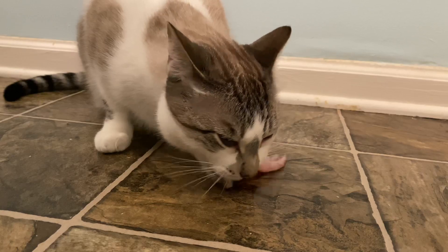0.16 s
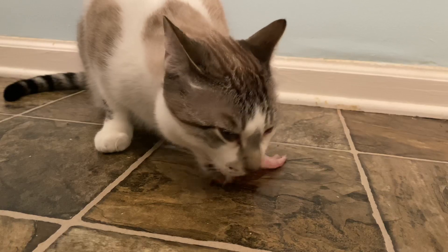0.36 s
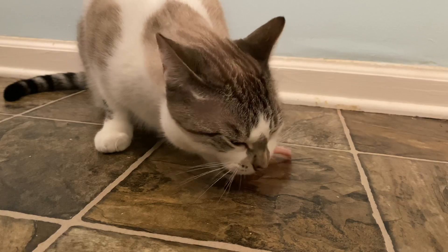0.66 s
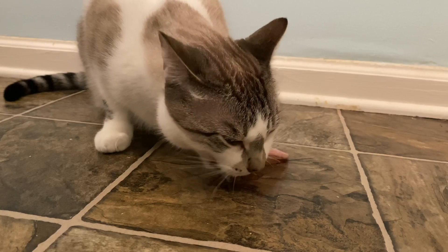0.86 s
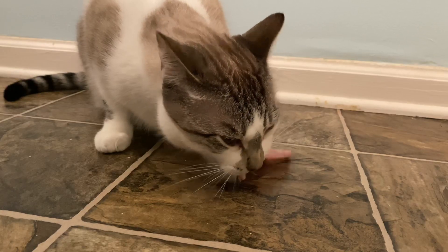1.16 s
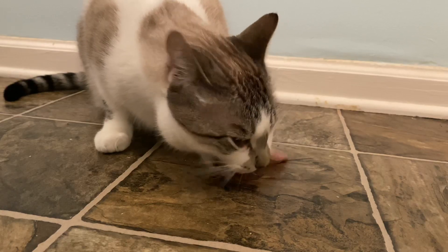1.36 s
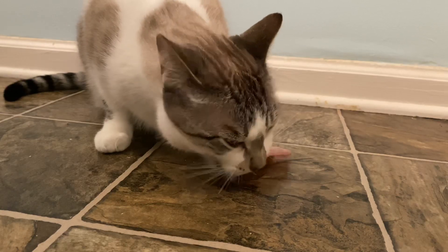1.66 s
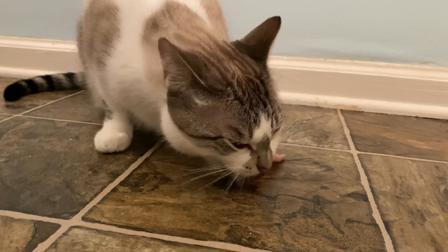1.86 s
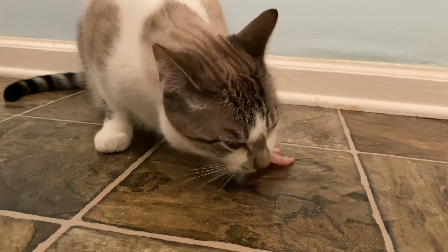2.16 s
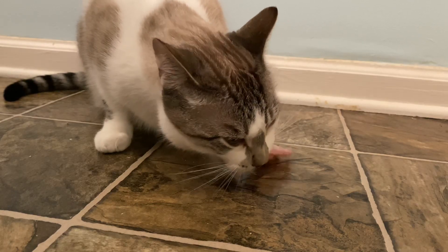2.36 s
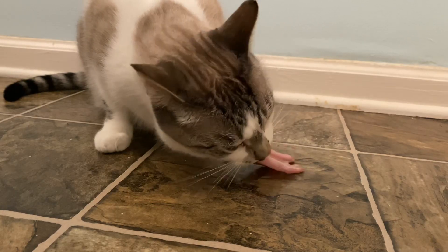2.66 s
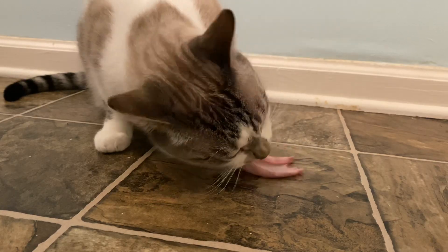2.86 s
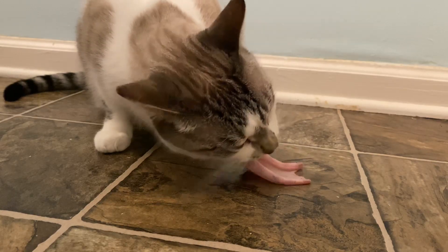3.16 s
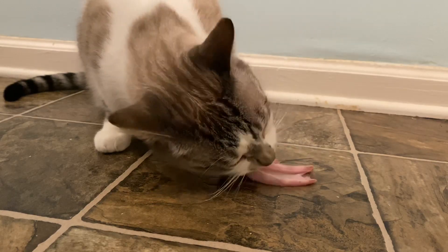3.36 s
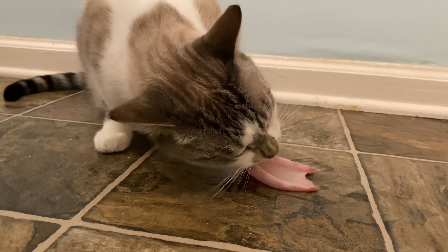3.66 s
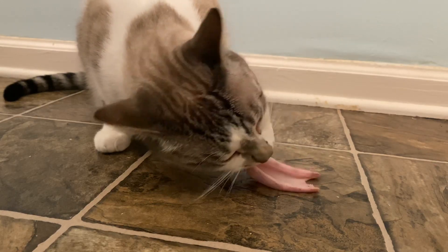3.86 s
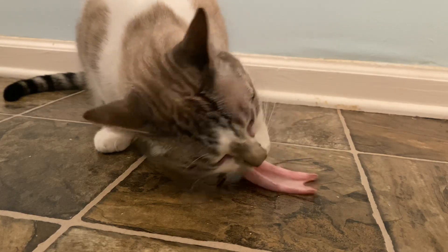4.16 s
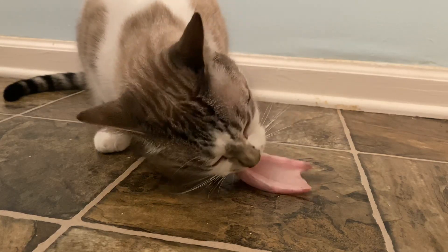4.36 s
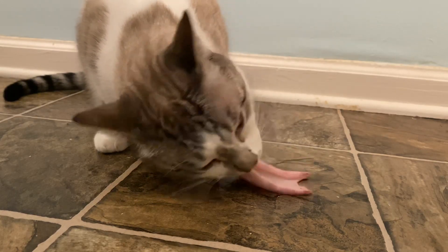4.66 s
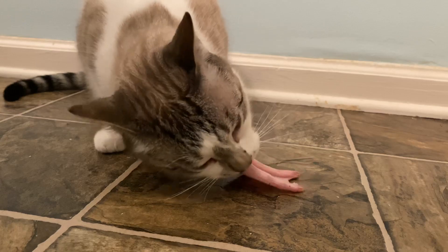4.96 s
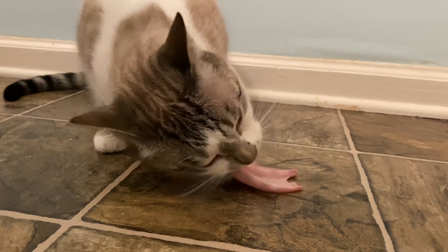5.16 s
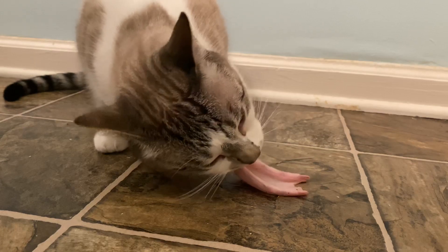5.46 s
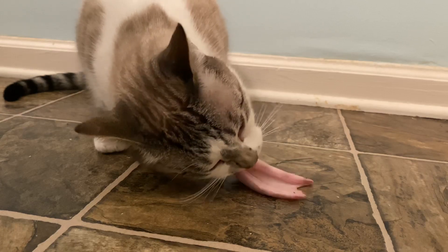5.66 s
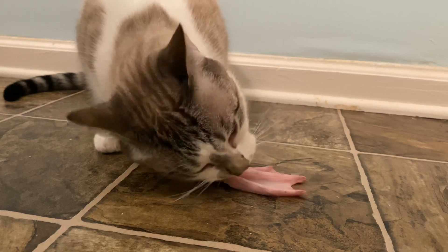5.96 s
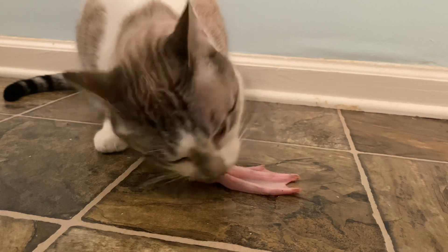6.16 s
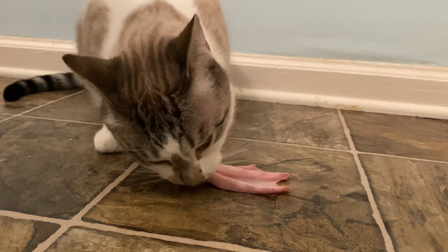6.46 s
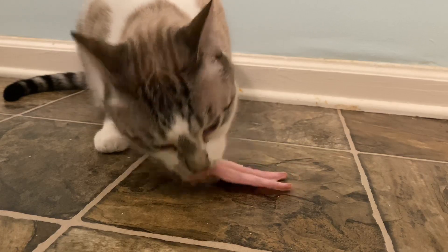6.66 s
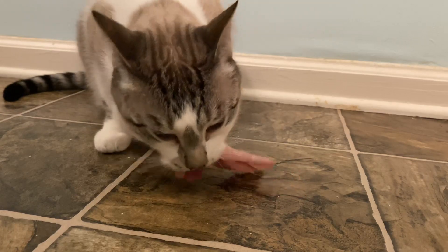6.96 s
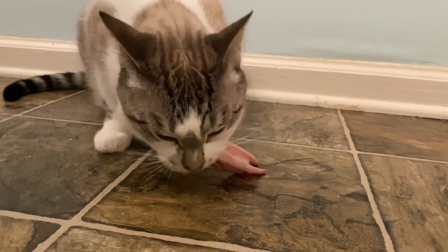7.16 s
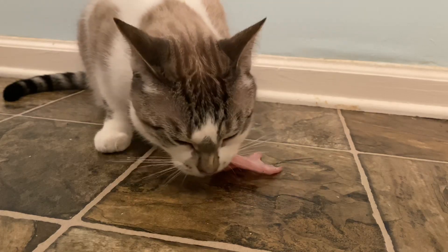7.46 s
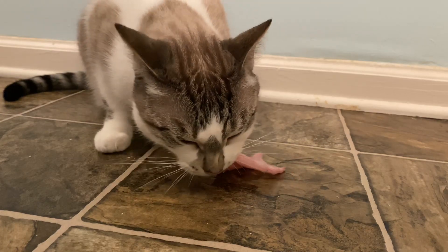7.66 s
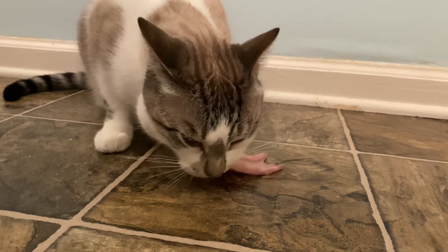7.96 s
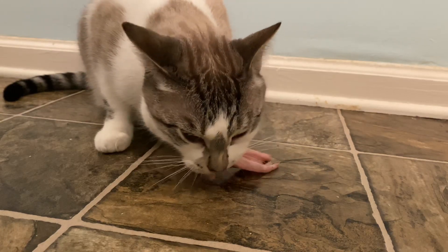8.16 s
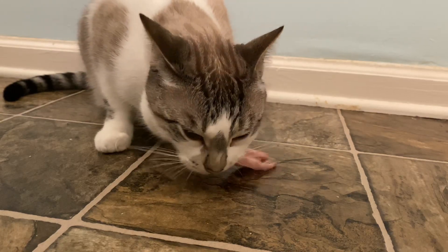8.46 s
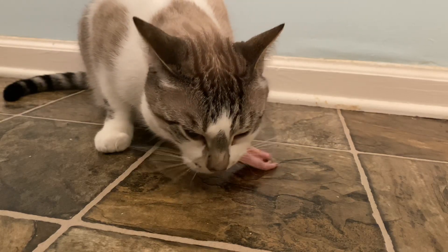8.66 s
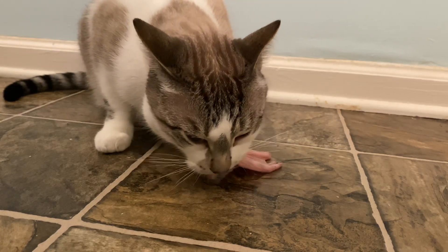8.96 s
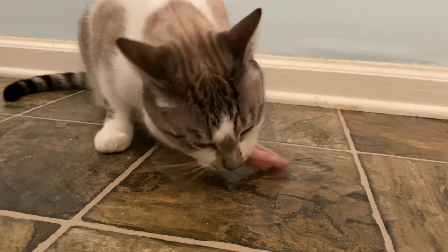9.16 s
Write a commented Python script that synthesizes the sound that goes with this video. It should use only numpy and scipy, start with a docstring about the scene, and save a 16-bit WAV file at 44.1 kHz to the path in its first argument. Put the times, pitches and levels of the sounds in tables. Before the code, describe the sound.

A cat chews a raw bird's foot very close to a stereo microphone. Irregular tooth clicks and brittle bone cracks stand out over wet squelches and crackling skin, loudest near three to four seconds and again at about seven and a half. A calmer stretch lies between. The small tiled room rings briefly after each crack, over faint rumble and hiss.

```python
"""Teeth click and small bones crack: a cat gnaws a raw bird's foot, close to a stereo pair of microphones.
Wet skin squelches and crackles between the bites; dull bumps and one soft rub lie underneath.
The place is a small hard room with a tiled floor: it rings after each crack, over faint rumble and hiss.
A thin whistle comes and goes, heard only by way of the room.
Bites are noise bursts through resonances, wet sounds are sparse pops, bumps and whistle are sines."""
import sys
import numpy as np
from scipy import signal
from scipy.fft import rfft, irfft
from scipy.io import wavfile
from scipy.ndimage import uniform_filter1d

SR = 44100
rng = np.random.default_rng(int(sys.argv[2]) if len(sys.argv) > 2 else 0)


def digitize_waveform(pressure):
    """Quantize a signal to 16-bit integers and store it at the path in sys.argv[1].

    Rows of a 2-D input are taken as channels; values are limited to [-1, 1].
    """
    field = np.atleast_2d(pressure).T
    bounded = np.clip(field, -1, 1)
    quanta = np.round(bounded * 32767).astype(np.int16)
    wavfile.write(sys.argv[1], SR, quanta)


N = 410571
TIME = np.arange(N) / SR  # [s]
KERNEL_HZ = np.fft.rfftfreq(2048, 1 / SR) + 1  # frequencies at which resonances are drawn, kept off zero

# Hard bites: (t/s, pitch of the snap f/Hz, snap level/dB, dull jaw knock level/dB, sharp tick level/dB)
BITES = [(0.029, 2530, -46.5, -53.5, -73), (0.2319, 1400, -65, -77, -62), (0.311, 2370, -55, -77, -65),
         (0.3793, 1570, -51, -74, -62), (0.4775, 1770, -57, -50, -57.5), (0.5521, 2240, -33.5, -43.5, -36),
         (0.6135, 1830, -41, -64, -57), (0.634, 1930, -49, -42.5, -74), (0.6921, 1920, -41.5, -47, -44.5),
         (0.8781, 2600, -42, -74, -47), (1.0545, 1210, -52, -67, -66), (1.0915, 1540, -49, -51.5, -47.5),
         (1.284, 1540, -57.5, -77, -61.5), (1.377, 1860, -49, -51, -65), (1.472, 1260, -58, -61, -43.5),
         (1.5289, 2290, -41, -51, -33.5), (1.7238, 2520, -47.5, -64, -75), (1.8117, 2400, -61, -68, -50.5),
         (1.8248, 2140, -46, -49.5, -50.5), (1.898, 2400, -64, -73, -55.5), (2.018, 2230, -44, -64, -47.5),
         (2.314, 2400, -75, -74, -62), (2.397, 1270, -64, -82, -55), (2.4418, 1640, -46.5, -70, -66),
         (2.4853, 2360, -58, -81, -62), (2.684, 6000, -74, -87, -57), (2.714, 1800, -48.5, -60, -46.5),
         (2.8867, 1970, -36, -42, -38.5), (2.987, 1580, -56, -44.5, -57), (3.0204, 1670, -50, -68, -45),
         (3.044, 1380, -25.5, -36.5, -19.5), (3.1739, 1950, -57, -54, -42), (3.3878, 1690, -35, -37, -39.5),
         (3.414, 1870, -52, -51, -43.5), (3.4716, 1580, -51.5, -63, -43.5), (3.528, 3440, -35, -26.5, -42),
         (3.6135, 2120, -20, -26.5, -32), (3.6738, 4040, -30.5, -24.5, -40.5),
         (3.962, 1800, -55.5, -66, -56), (4.2035, 1890, -45, -51.5, -52.5),
         (4.3101, 2020, -53.5, -55.5, -58.5), (4.384, 1670, -68, -60, -57), (4.458, 1420, -43, -59, -39),
         (4.5447, 2470, -57, -78, -62), (4.739, 1230, -49.5, -52, -66), (4.893, 4070, -54, -76, -79),
         (5.0173, 1810, -48, -66, -53.5), (5.0772, 2210, -49.5, -76, -75), (5.152, 2460, -41, -52, -75),
         (5.2325, 2720, -50, -48.5, -78.5), (5.261, 2470, -47.5, -45.5, -78),
         (5.6679, 1560, -52.5, -59.5, -73.5), (6.678, 1580, -57.5, -74.5, -56),
         (6.707, 1670, -60, -66, -52.5), (6.8017, 2090, -64, -75.5, -61.5),
         (6.9897, 4550, -54.5, -70.5, -62), (7.434, 1670, -52, -52, -56), (7.5436, 4070, -36.5, -37.5, -45),
         (7.5679, 1970, -15, -23, -28.5), (7.7535, 3410, -48.5, -72, -75), (7.807, 2160, -52, -49, -50.5),
         (7.938, 1460, -48, -56, -60), (8.1085, 1200, -53, -46, -52.5), (8.355, 1670, -49.5, -82, -75),
         (8.439, 2034, -55.5, -72, -57.5), (8.4958, 2090, -32, -43, -33.5), (8.612, 2630, -48, -72, -70),
         (8.6856, 2160, -41, -71.5, -60), (9.0334, 1670, -57, -78.5, -58)]
# Freed pieces that ring on: (t/s, f/Hz, fall by 60 dB t/s, level/dB before RING_TRIM_DB)
FREED_PIECES = [(.552, 5120, 0.0089, -37.5), (0.877, 2730, 0.038, -48), (1.529, 4540, 0.017, -43),
                (3.0438, 5600, 0.0091, -18.5), (3.0445, 4930, 0.0054, -22.5), (3.045, 1630, 0.013, -40),
                (3.614, 1630, 0.0052, -19), (4.458, 1540, .02, -45.5), (5.15, 2600, .12, -57),
                (5.231, 2850, .05, -51.5), (6.988, 4980, .015, -51), (7.568, 1870, 0.02, -18.5),
                (7.568, 462, 0.019, -40), (7.937, 1594, 0.037, -48), (8.109, 1293, .06, -50.5),
                (8.686, 3040, .025, -44), (8.686, 1500, 0.045, -50.5)]
# Jaw strokes: (t/s, length t/s, mouth resonance f/Hz, then, before their trims:
# squelch level/dB, skin crackle level/dB, saliva fizz level/dB)
JAW_STROKES = [(0.027, 0.082, 1830, -55, -58, -72.5), (.235, 0.1, 2270, -80, -71.5, -85),
               (.365, .09, 1710, -56, -57.5, -70), (.49, .05, 2000, -76, -66, -73),
               (0.551, 0.1, 2500, -50.5, -53.5, -64), (0.862, .05, 2790, -61, -68.5, -64),
               (1.059, 0.08, 1580, -66, -60.5, -69), (1.283, 0.046, 1690, -57, -66, -76),
               (1.344, 0.082, 1900, -57, -59, -66.5), (1.466, 0.12, 1770, -63, -56, -65),
               (1.641, 0.11, 2520, -55.5, -55.5, -71.5), (1.789, 0.13, 2120, -71, -62.5, -65.5),
               (1.999, 0.054, 2160, -58, -65, -67.5), (2.121, 0.029, 1930, -60.5, -69, -72.5),
               (2.197, 0.016, 2000, -74, -70.5, -81), (2.4, 0.085, 1600, -56, -64.5, -75.5),
               (2.697, 0.085, 1600, -58.5, -58, -65.5), (2.799, 0.054, 1800, -70, -66.5, -88),
               (2.877, 0.052, 2170, -51, -54.5, -67.5), (2.988, 0.1, 1700, -63, -56, -64),
               (3.171, .04, 2000, -51.5, -58, -63), (3.286, .08, 1810, -78, -68, -72),
               (3.386, .11, 1750, -65, -61, -67), (3.536, 0.25, 2000, -57.5, -52.5, -65.5),
               (3.87, 0.12, 1800, -73, -69.5, -80), (4.017, .04, 1515, -66, -75, -92.5),
               (4.13, 0.028, 1760, -58.5, -64.5, -70.5), (4.201, 0.042, 1730, -63, -64, -75),
               (4.287, 0.15, 1700, -73.5, -63, -74), (4.459, .05, 1500, -68, -65, -64.5),
               (4.582, .09, 1980, -53, -57.5, -69.5), (4.749, 0.093, 1550, -65, -59, -66),
               (4.882, .08, 1700, -74.5, -69.5, -81), (4.998, .04, 1740, -54.5, -59, -68.5),
               (5.063, .04, 1930, -52, -66, -72), (5.15, .04, 2530, -66, -60, -70),
               (5.212, 0.061, 2710, -49, -59, -80), (5.358, 0.053, 2150, -55.5, -65, -70),
               (5.546, 0.12, 1600, -70.5, -63.5, -70), (5.764, 0.061, 1850, -57.5, -59.5, -70),
               (5.99, .025, 1750, -71, -74, -87), (6.079, .06, 1860, -60.5, -62.5, -81.5),
               (6.53, 0.099, 1700, -89.5, -91, -83), (6.68, 0.056, 1690, -64, -64.5, -69),
               (6.904, 0.055, 1310, -71, -66.5, -77.5), (6.992, .05, 1590, -53, -54, -75),
               (7.049, 0.093, 1600, -70.5, -64, -69.5), (7.253, 0.086, 1650, -65, -63, -80),
               (7.338, 0.057, 1540, -61, -62.5, -67), (7.46, .14, 1590, -65, -64, -80),
               (7.789, 0.031, 2410, -53.5, -61, -64.5), (7.895, 0.067, 1550, -53.5, -64, -64.5),
               (7.982, .09, 1490, -76, -65.5, -77), (8.11, 0.045, 1340, -65, -62.5, -74),
               (8.216, 0.064, 1500, -75, -67.5, -71), (8.344, 0.066, 1540, -59, -59.5, -72.5),
               (8.495, 0.047, 2000, -64, -56, -60), (8.669, 0.022, 2420, -51, -62, -64),
               (8.806, 0.046, 1590, -61, -60, -68.5), (9.03, 0.13, 1693, -64.5, -61.5, -74.5)]
# Spectrum of the sharp ticks: (f/Hz, relative level/dB)
TICK_COLOUR = [(300, -48), (1000, -28.5), (3000, -2), (5600, 2.5), (6600, 1.5), (8000, -1.5), (9300, -13),
               (11500, -3.5), (13400, -16.5), (15200, -3), (17000, -24)]
# Spectrum of crackling skin: (f/Hz, relative level/dB)
SKIN_COLOUR = [(150, -12), (400, 0), (520, -4.5), (850, 4.5), (1100, -7.5), (1600, 6.5), (2100, -3.5),
               (2800, 0), (3500, -15.5), (4500, -9.5), (7000, -30.5), (16000, -45.5)]
# Spectrum of fizzing saliva: (f/Hz, relative level/dB)
SALIVA_COLOUR = [(1000, -31.5), (3000, -8), (4500, -0.5), (7500, 0), (9300, -9), (11500, -0.5),
                 (13400, -10.5), (15200, -3.5), (17000, -17.5)]
# Fixed resonances and dips of the mouth's sounds: (centre f/Hz, width f/Hz, boost level/dB)
MOUTH_RESONANCES = [(436, 60, 8), (540, 63, -4.5), (850.6, 110, 8.5), (1207, 150, -7), (1587, 140, 5),
                    (1985, 410, 5), (2727, 100, 4.5)]
# Dull bumps: (t/s, swell t/s, rms level/dB at the top of the swell, brightness f/Hz)
DULL_BUMPS = [(0.459, 0.026, -51.5, 200), (.555, 0.027, -40, 108.4), (1.084, 0.021, -44.5, 148.5),
              (1.361, 0.011, -48, 149), (1.81, 0.025, -47.5, 140), (2.071, 0.016, -47.5, 130),
              (2.885, 0.029, -44, 152), (3.528, .015, -34, 156), (3.615, 0.015, -40, 130),
              (3.675, 0.02, -43, 200), (4.219, 0.051, -52, 158), (4.584, 0.015, -52, 200),
              (5.152, 0.012, -51, 201.5), (6.185, 0.017, -43, 79.5), (6.425, 0.0187, -49, 90),
              (6.79, .015, -52, 89), (7.544, 0.022, -45.5, 200), (8.741, 0.033, -41.5, 141),
              (8.811, 0.012, -37, 80.4), (8.91, 0.016, -43.5, 81.3)]
# Low modes of a bump, before detuning and brightness: (f/Hz, relative level/dB)
BUMP_MODES = [(58, -9), (74, -1), (122, -6), (160, -8), (195, -11), (240, -8.5), (290, -6.5), (420, -10.5)]
# Spectrum of the soft rub: (f/Hz, relative level/dB)
RUB_SPECTRUM = [(15, -40), (25, -11), (65, -7.5), (167, -14), (226, -6), (299, -7.5), (358, -28),
                (568, -34.5), (644, -44), (700, -42), (910, -78), (1540, -120)]
# Whistle, one list a note: (t/s, f/Hz, level/dB before WHISTLE_TRIM_DB)
WHISTLE_NOTES = [
    [(5.41, 1450, -65), (5.52, 1532, -64.5), (5.7, 1474, -64.5), (5.88, 1455, -66.5), (6.02, 1447, -88.5)],
    [(6.88, 1400, -77), (6.96, 1286, -59), (7.1, 1280, -86)],
    [(7.84, 1514, -54), (7.96, 1462, -57), (8.04, 1365, -52), (8.11, 1284, -62), (8.2, 1282, -64),
     (8.3, 1278, -59), (8.38, 1295, -59)],
]
# Decay of the room by band: (f/Hz, fall by 60 dB t/s)
ROOM_DECAY = [(100, 0.62), (400, 0.3), (1500, 0.36), (4000, 0.28), (8000, 0.3), (16000, 0.055)]
# Spectrum of the reflections: (f/Hz, relative level/dB)
REFLECTION_COLOUR = [(60, -11), (380, 3), (540, -1.5), (820, 0), (1120, 0), (1600, -3), (5000, 1),
                     (9000, -3), (16000, -5.5)]
# Spectrum of the room's rumble: (f/Hz, relative level/dB)
RUMBLE_COLOUR = [(20, -33), (35, -21), (48, -12), (59, -1), (76, -1), (98, -12.5), (120, -4), (145, -17),
                 (220, -23), (400, -26), (900, -57.5)]
# Loudness of the rumble over time: (t/s, rms level/dB)
RUMBLE_COURSE = [(0, -58.5), (2.5, -59.5), (5.3, -60.5), (5.7, -65), (8.03, -59.5), (8.12, -76),
                 (8.42, -72.5), (8.55, -67), (9.31, -59.5)]
# Spectrum of the room's hiss: (f/Hz, relative level/dB)
HISS_COLOUR = [(88, -40), (150, -7), (201, -5.5), (315, -8), (361, -14), (422, -18.5), (504, -6.5),
               (979, -20), (5460, -32), (8230, -35), (16000, -42)]

RING_TRIM_DB, SQUELCH_TRIM_DB, SKIN_TRIM_DB, SALIVA_TRIM_DB, WHISTLE_TRIM_DB = 9, -2.5, -2.5, .5, -2.5
# Grazes: snap and knock relative to the skin crackle, tick relative to the saliva
GRAZE_SNAP_DB, GRAZE_KNOCK_DB, GRAZE_TICK_DB = 1.5, -8, 7.5
GRAZE_HZ, GRAZE_SPREAD_DB, GRAZE_LATE_S = 2095, 3, .02  # middle pitch, force either way, time past the stroke
# The jaw closes quickly, eases, lets go
CHEW_ATTACK_S, CHEW_SAG_DB_PER_S, CHEW_RELEASE_DB_PER_S = 0.014, 24.5, 231
# The lips part before a stroke: time, level relative to the stroke, ceiling
LEAD_IN_S, LEAD_IN_DB, LEAD_IN_TOP_DB = 0.087, -10, -67.5
SQUELCH_SHARE = .7  # wet films burst in this first part of a stroke
RUB_AT_S, RUB_RISE_S, RUB_DB, RUB_FADE_DB_PER_S = 8.715, 0.076, -40.5, 82
WHISTLE_BREATH = 0.66  # airy noise against the clean tone
PATTERNS_PER_S = 2.7  # how fast the pattern of reflections is replaced
HISS_DB = -74
RIGHT_DELAY = 4  # direct sound reaches the right microphone this much later [samples]
BAND_EDGE_HZ = 16400


def teeth(hz, snap_db, knock_db, tick_db):
    """One bite: a snap at the pitch of the piece, a knock through the jaw and a sharp tick."""
    colour = body(KERNEL_HZ)
    # loud bites are bone, which breaks at once; soft gristle gives way slowly
    tearing = np.interp(max(snap_db, tick_db), [-45, -22], [1.8, .4])
    snap = fracture(colour * bell(hz, q=1.28), splinter=tearing, spread_s=0.0012 * tearing)
    knock = fracture(colour * bell(hz=730, q=0.63), splinter=0.21, spread_s=0.0018)
    tick = fracture(amp(read(TICK_COLOUR, KERNEL_HZ)), splinter=11, spread_s=0.001 * tearing)
    return amp(snap_db) * snap + amp(knock_db) * knock + amp(tick_db) * tick


def cracks():
    """The hard bites; fibres give 2 ms before each break, as a fainter, broad burst."""
    out = np.zeros(N)
    for s, hz, snap_db, knock_db, tick_db in BITES:
        add(out, s, teeth(hz, snap_db, knock_db, tick_db))
        fibres = fracture(bell(hz=3500, q=0.84), splinter=1.3, spread_s=.0015)
        add(out, s - .002, amp(snap_db - 20.5) * fibres)
    return out


def grazes(count=2):
    """In every stroke the teeth graze the bone a couple of times, about as hard as the skin is worked."""
    out = np.zeros(N)
    for s, length, _, _, skin_db, saliva_db in JAW_STROKES:
        for when, pitch, force in rng.uniform(-1, 1, (count, 3)):
            at_s = s + (length + GRAZE_LATE_S) * (1 + when) / 2
            hz = GRAZE_HZ * 2 ** (pitch / 2)  # up to half an octave either way
            force_db = GRAZE_SPREAD_DB * force
            snap_db = skin_db + force_db + GRAZE_SNAP_DB
            knock_db = skin_db + force_db + GRAZE_KNOCK_DB
            tick_db = saliva_db + force_db + GRAZE_TICK_DB
            add(out, at_s, teeth(hz, snap_db, knock_db, tick_db))
    return out


def rings():
    """A freed piece rings briefly: a sine that dies away exponentially."""
    out, t = np.zeros(N), np.arange(SR // 6) / SR
    for s, hz, t60, db in FREED_PIECES:
        add(out, s, amp(db + RING_TRIM_DB - 60 * t / t60) * np.sin(2 * np.pi * hz * t))
    return out


def squelches():
    """A stroke bursts many tiny wet films, which ring in the mouth as its resonance glides upward."""
    out = np.zeros(N)
    for s, length, hz, db, _, _ in JAW_STROKES:
        count = max(int(SQUELCH_SHARE * length * SR), 200)  # samples
        films = pops(count, per_s=700, spread_db=3.5) * signal.windows.tukey(count, .5)
        opening = np.linspace(0, 1, count)
        sound = 0
        for share, pitch in (1 - opening, hz * .94), (opening, hz * 1.06):
            cavity = bell(pitch, q=5.4) + .3 * bell(pitch * 1.6, q=12) + .3 * bell(pitch * 1.1, q=0.88)
            sound = sound + signal.fftconvolve(films * share, ring(cavity * body(KERNEL_HZ)))
        level = np.sqrt(count / (np.sum(sound ** 2) + 1e-20))  # rms 1 over the bursting
        add(out, s, amp(db + SQUELCH_TRIM_DB) * level * sound)
    return out


def gnawing():
    """Crackle of skin and fizz of saliva; the hollow of the mouth drifts as the jaw works."""
    grit = pops(N, per_s=520, spread_db=5.0)
    jaw = uniform_filter1d(uniform_filter1d(rng.standard_normal(N), size=3000), size=3000)
    opening = .5 + .5 * np.tanh(1.5 * evened(jaw))
    # the skin spectrum shifted down and up; the second set of pops is displaced by one second
    low = coloured(grit, np.multiply(SKIN_COLOUR, [.88, 1]))
    high = coloured(np.roll(grit, SR), np.multiply(SKIN_COLOUR, [1.2, 1]))
    crackle = np.sqrt(1 - opening) * low + np.sqrt(opening) * high
    fizz = coloured(pops(N, per_s=1100, spread_db=5.0), SALIVA_COLOUR)
    *_, skin_db, saliva_db = np.transpose(JAW_STROKES)
    skin = crackle * strokes(skin_db + SKIN_TRIM_DB, rest_db=-90.5)
    return skin + fizz * strokes(saliva_db + SALIVA_TRIM_DB, rest_db=-96.5)


def strokes(levels_db, rest_db):
    """Strength of the chewing: the lips part, then each stroke rises, sags while held and dies away."""
    power, t = np.full(N, amp(rest_db) ** 2), np.arange(SR // 2) / SR
    for (s, length, *_), db in zip(JAW_STROKES, levels_db):
        parting = np.linspace(0, 1, int(min(LEAD_IN_S, s) * SR))
        lead_in_db = min(db + LEAD_IN_DB, LEAD_IN_TOP_DB)
        add(power, s - len(parting) / SR, parting * amp(lead_in_db) ** 2)
        fall_db = CHEW_SAG_DB_PER_S * t + CHEW_RELEASE_DB_PER_S * np.maximum(t - length, 0)
        stroke = np.minimum(t / CHEW_ATTACK_S, 1) * amp(db - fall_db)
        add(power, s - CHEW_ATTACK_S / 2, stroke ** 2)
    return np.sqrt(power)


def body(hz):
    """Gain of the fixed resonances of the mouth's sounds."""
    return amp(sum(db / (1 + (2 * (hz - centre) / width) ** 2) for centre, width, db in MOUTH_RESONANCES))


def bumps():
    """Soft pushes that swell and die in a few low resonances, each a little detuned."""
    out, t = np.zeros(N), np.arange(SR // 3) / SR
    for s, swell, db, bright_hz in DULL_BUMPS:
        chance = rng.random((len(BUMP_MODES), 2))
        modes = 0
        for (hz, mode_db), (detune, turn) in zip(BUMP_MODES, chance):
            gain = amp(mode_db) / (1 + (hz / bright_hz) ** 2)
            # turn is the starting phase, as a share of a full cycle
            modes = modes + gain * np.sin(2 * np.pi * (hz * (.94 + .12 * detune) * t + turn))
        add(out, s, amp(db) * evened(modes) * t / swell * np.exp(1 - t / swell))
    return out


def rub():
    """A short muffled rubbing: low noise that swells quickly and fades."""
    t = np.maximum(TIME - RUB_AT_S, 0)
    fade_db = RUB_FADE_DB_PER_S * np.maximum(t - RUB_RISE_S, 0)
    level = np.minimum(t / RUB_RISE_S, 1) * amp(RUB_DB - fade_db)
    return coloured(rng.standard_normal(N), RUB_SPECTRUM) * level


def whistle():
    """A faint reedy whistle: a sine, its octave and airy noise, fluttering in pitch and strength."""
    out = np.zeros(N)
    for note in WHISTLE_NOTES:
        s, hz, db = np.transpose(note)
        t = np.arange(s[0], s[-1], 1 / SR)
        waver, flutter = (evened(uniform_filter1d(v, size=350)) for v in rng.standard_normal((2, len(t))))
        angle = 2 * np.pi * np.cumsum(np.interp(t, s, hz) * (1 + .012 * waver)) / SR
        air = evened(uniform_filter1d(rng.standard_normal(len(t)), size=110))
        reed = (1 + 0.66 * flutter) * (np.sin(angle) + amp(-18) * np.sin(2 * angle))
        tone = evened(reed + WHISTLE_BREATH * air * np.cos(angle))
        level = amp(np.interp(t, s, db) + WHISTLE_TRIM_DB)
        add(out, s[0], level * tone * signal.windows.tukey(len(t), .25))
    return out


def moving_room(x, count=3):
    """As the head moves, the pattern of reflections passes from one to the next, round and round."""
    place = TIME * PATTERNS_PER_S
    out = 0
    for k in range(count):
        away = abs((place - k + count / 2) % count - count / 2)
        share = np.cos(np.pi / 2 * np.minimum(away, 1))
        out = out + room(x * share, early_db=5, early_s=.004)
    return out


def room(x, early_db, early_s):
    """Dense reflections, strongest at first from tiles and near wall; each band dies at its own speed."""
    t = np.arange(SR * 2 // 5) / SR
    present = (rng.random((2, len(t))) < .25) * (t > .0012)
    taps = rng.standard_normal((2, len(t))) * present
    taps *= 1 + amp(early_db) * np.exp(-t / early_s)
    hz, at, z = signal.stft(taps, SR, nperseg=256)
    decay_db = 60 * at / read(ROOM_DECAY, hz)[:, None]
    z *= amp(read(REFLECTION_COLOUR, hz)[:, None] - decay_db)
    tail = signal.istft(z, SR, nperseg=256)[1]
    tail /= np.linalg.norm(tail, axis=1, keepdims=True)
    return signal.oaconvolve(x[None], tail, axes=1)[:, :N]


def room_tone():
    """Low rumble, nearly alike at both microphones, under a soft diffuse hiss; both are shaped noise."""
    s, db = np.transpose(RUMBLE_COURSE)
    rumble = coloured(rng.standard_normal(N) + 0.3 * rng.standard_normal((2, N)), RUMBLE_COLOUR)
    hiss = coloured(0.23 * rng.standard_normal(N) + rng.standard_normal((2, N)), HISS_COLOUR)
    return rumble * amp(np.interp(TIME, s, db)) + amp(HISS_DB) * hiss


def fracture(gain, splinter, spread_s):
    """One break and a quick spray of splinters through a resonance, with the energy of rms 1 over 5 ms."""
    t = np.arange(256) / SR
    burst = rng.standard_normal(len(t)) * np.exp(-t / spread_s)
    burst *= splinter / np.linalg.norm(burst)
    burst[0] += 1
    sound = signal.fftconvolve(burst, ring(gain))
    return sound / np.linalg.norm(sound) * np.sqrt(SR / 200)


def pops(count, per_s, spread_db):
    """Sparse clicks of either sign, a few much larger than the rest."""
    size = amp(spread_db * np.minimum(rng.exponential(1, count), 4))
    return size * rng.choice([-1, 1], count) * (rng.random(count) < per_s / SR)


def bell(hz, q):
    """Gain of one resonance; a higher q makes it narrower."""
    return 1 / (1 + (q * (KERNEL_HZ / hz - hz / KERNEL_HZ)) ** 2)


def ring(gain):
    """The causal (minimum-phase) impulse response that has this gain."""
    log_gain = np.log(np.maximum(np.r_[gain, gain[-2:0:-1]], 1e-4))
    return np.fft.ifft(np.exp(np.conj(signal.hilbert(log_gain)))).real


def coloured(x, points):
    """Gives a long signal a spectrum, at rms 1."""
    gain = amp(read(points, np.fft.rfftfreq(N, 1 / SR)))
    return evened(irfft(rfft(x) * gain, N))


def read(points, hz):
    """Reads a table on a log-frequency axis."""
    f, value = np.transpose(points)
    return np.interp(np.log(hz + 1), np.log(f), value)


def evened(x):
    """Scales to rms 1."""
    return x / np.sqrt(np.mean(x ** 2) + 1e-20)


def amp(db):
    """Decibels to gain."""
    return 10 ** (np.asarray(db) / 20)


def add(mix, s, sound):
    """Mixes a sound in at time s."""
    part = mix[max(round(s * SR), 0):][:len(sound)]
    part += sound[:len(part)]


def scene():
    """The cat's mouth is a little nearer the left microphone; tiles and room answer on both sides."""
    mouth = cracks() + grazes() + rings() + squelches() + gnawing()
    direct = np.array([mouth, np.roll(mouth, RIGHT_DELAY)])
    tiles = amp(-9) * np.array([np.roll(mouth, 35), np.roll(mouth, 31)])  # samples later, off the floor
    echo = moving_room(mouth + whistle()) * amp([[-4], [-4.5]])
    highpass = signal.butter(3, 45, "highpass", fs=SR, output="sos")
    dull = signal.sosfilt(highpass, bumps()) + rub()
    low = dull * amp([[-1.2], [.4]]) + amp(-11) * room(dull, early_db=3, early_s=0.012)
    return direct + tiles + echo + low + room_tone()


def record(dry):
    """The recorder's band limit, a steep low-pass."""
    lowpass = signal.firwin(511, BAND_EDGE_HZ, window=("kaiser", 9), fs=SR)
    return signal.oaconvolve(dry, lowpass[None], "same")


dry = scene()
out = record(dry)
digitize_waveform(out)
```